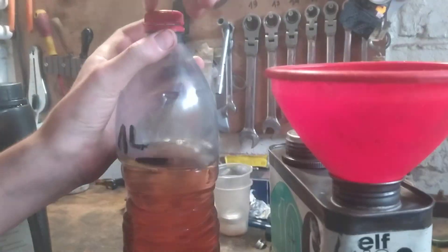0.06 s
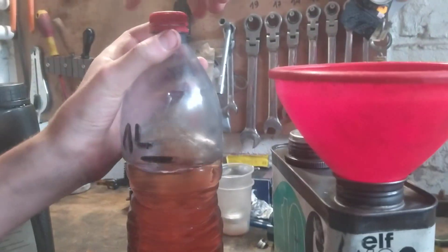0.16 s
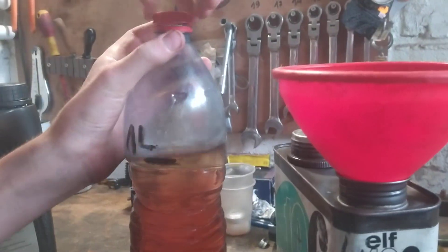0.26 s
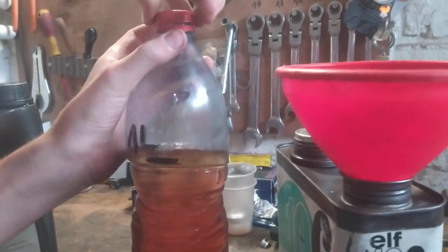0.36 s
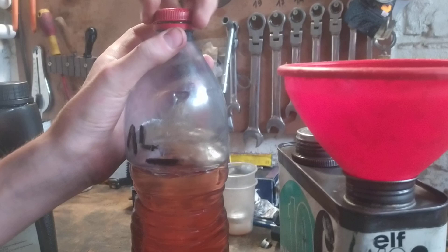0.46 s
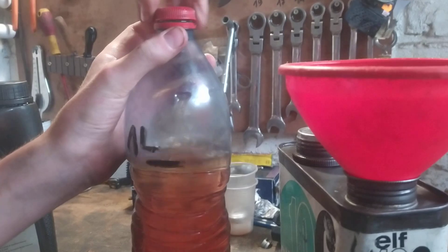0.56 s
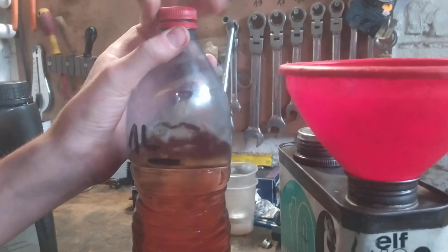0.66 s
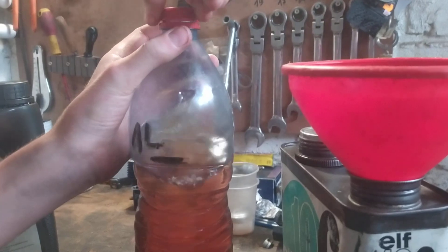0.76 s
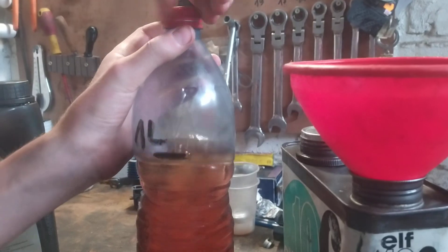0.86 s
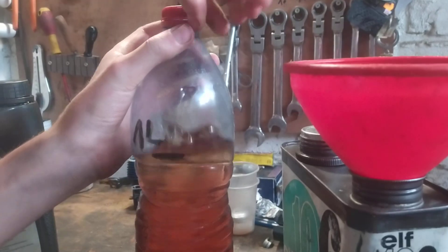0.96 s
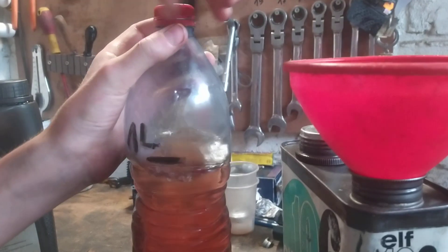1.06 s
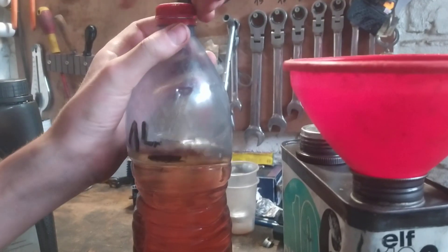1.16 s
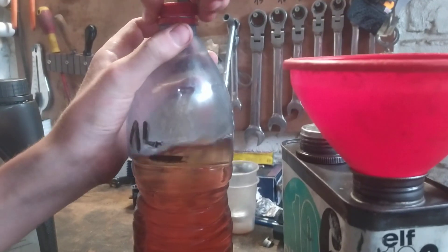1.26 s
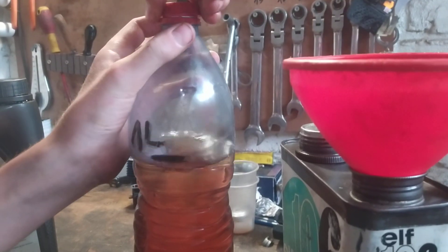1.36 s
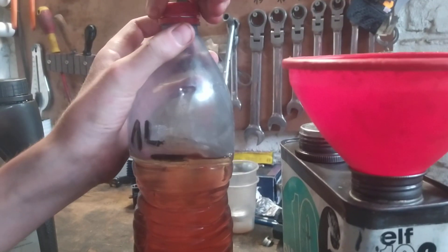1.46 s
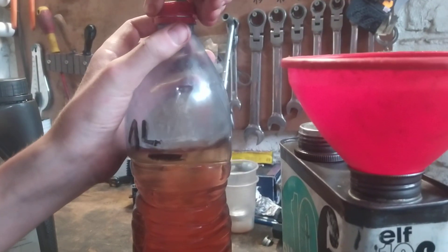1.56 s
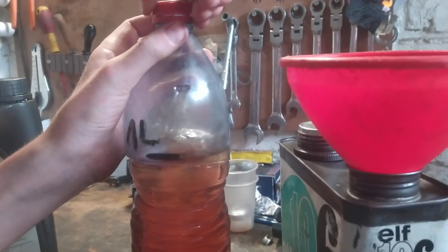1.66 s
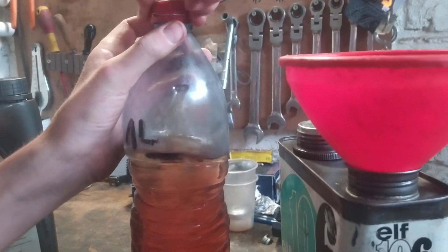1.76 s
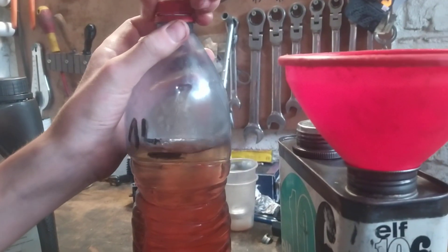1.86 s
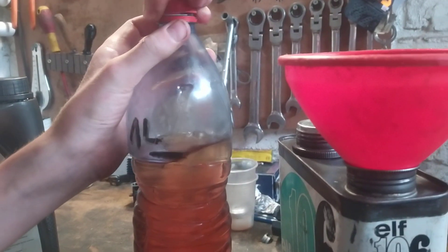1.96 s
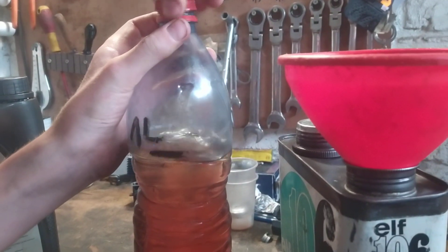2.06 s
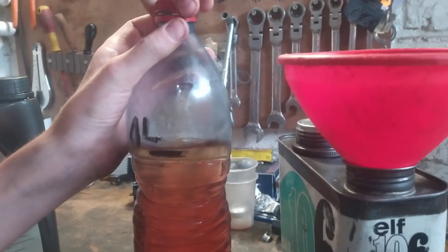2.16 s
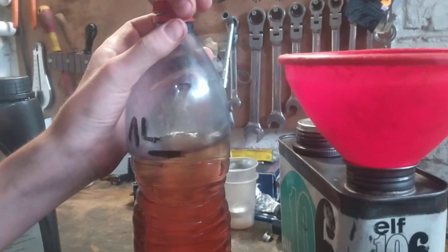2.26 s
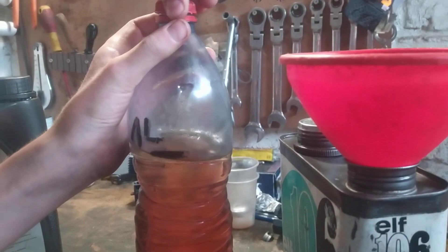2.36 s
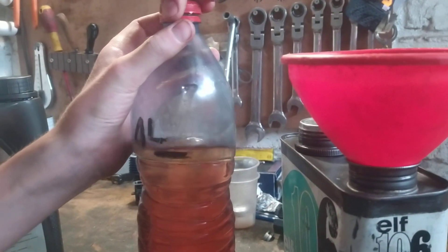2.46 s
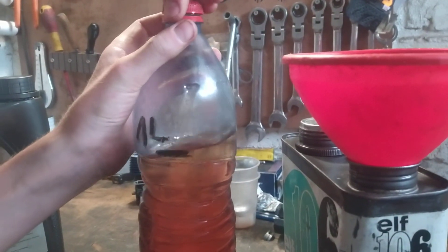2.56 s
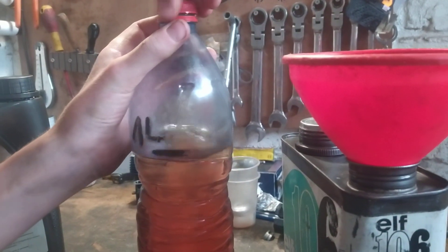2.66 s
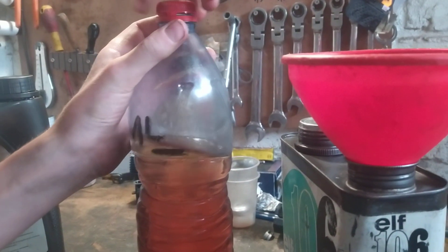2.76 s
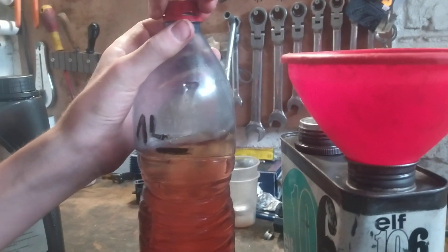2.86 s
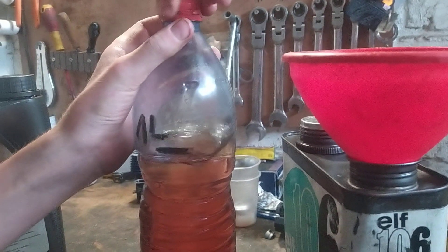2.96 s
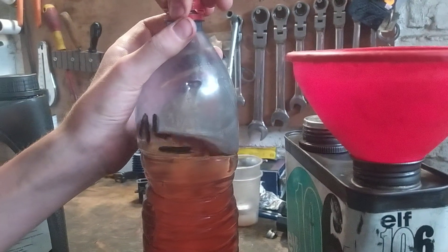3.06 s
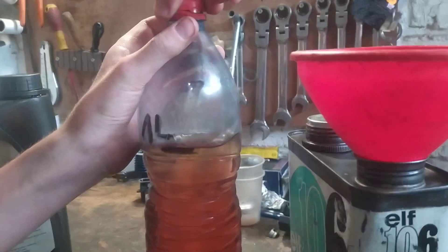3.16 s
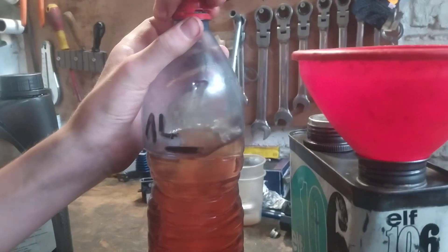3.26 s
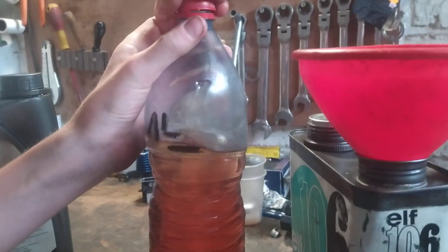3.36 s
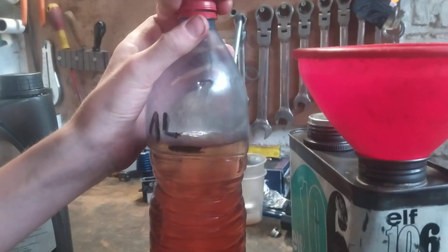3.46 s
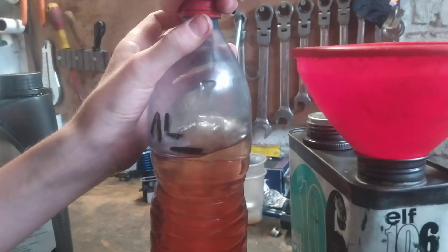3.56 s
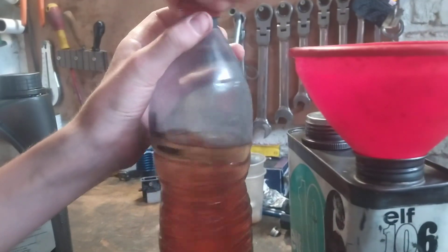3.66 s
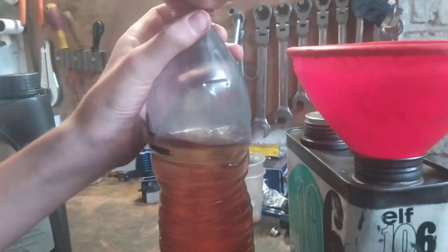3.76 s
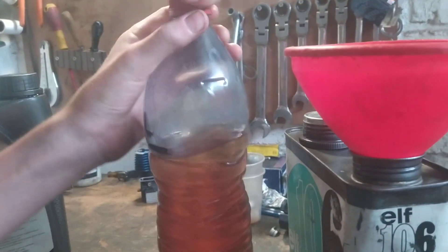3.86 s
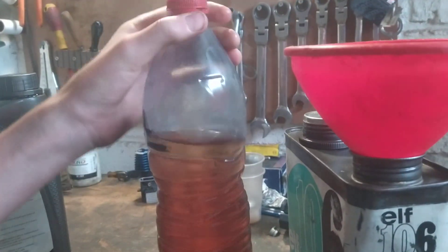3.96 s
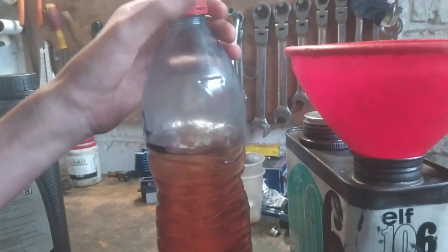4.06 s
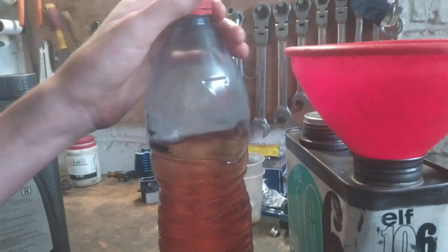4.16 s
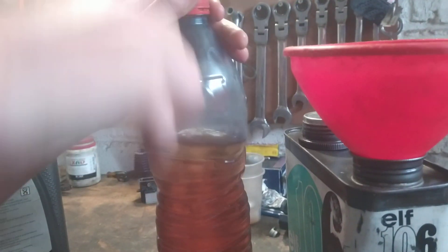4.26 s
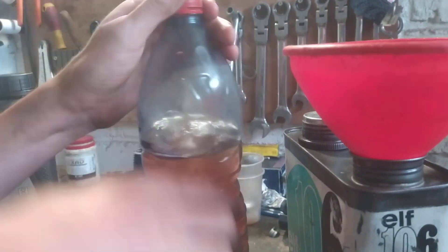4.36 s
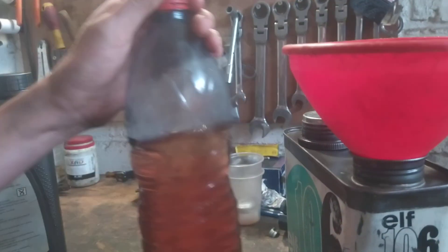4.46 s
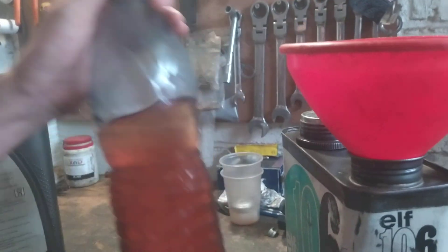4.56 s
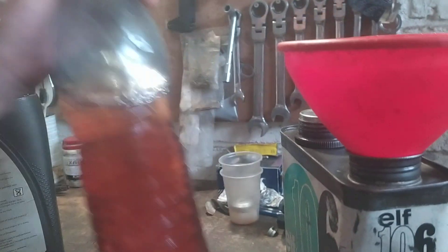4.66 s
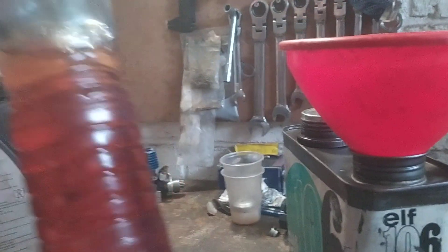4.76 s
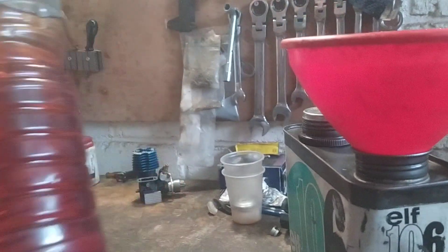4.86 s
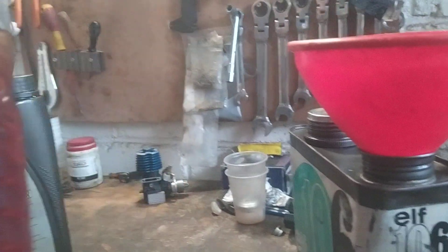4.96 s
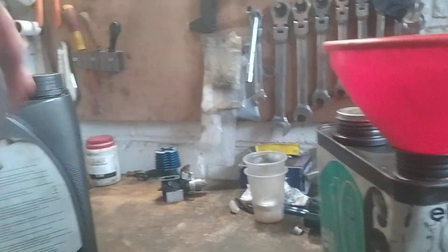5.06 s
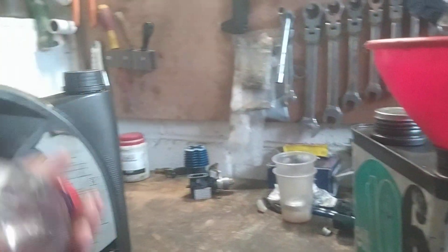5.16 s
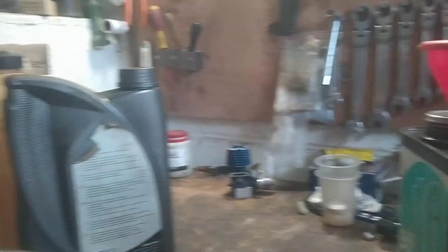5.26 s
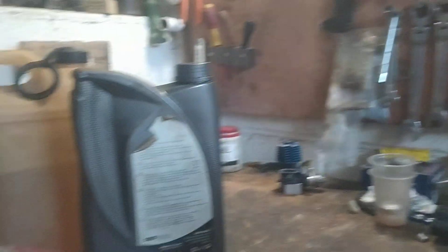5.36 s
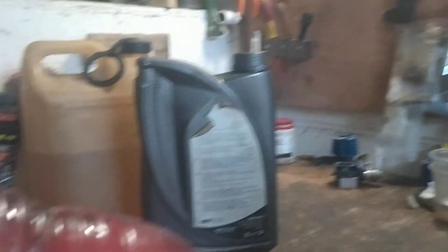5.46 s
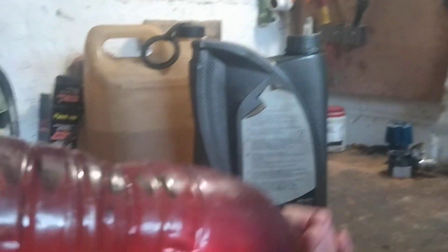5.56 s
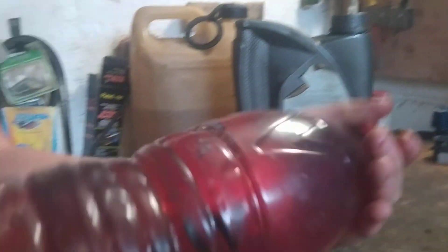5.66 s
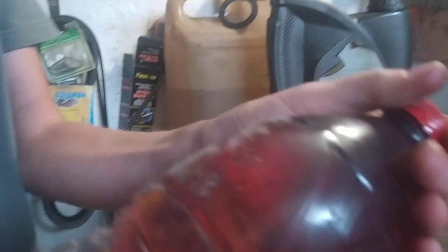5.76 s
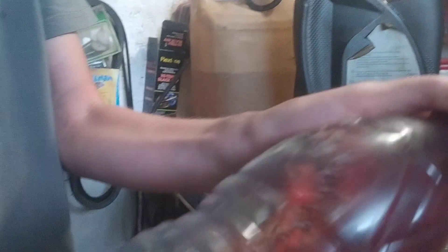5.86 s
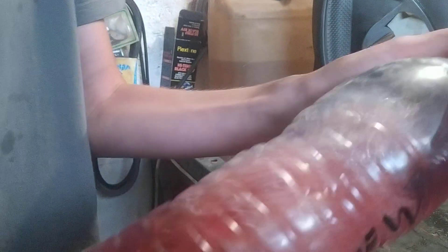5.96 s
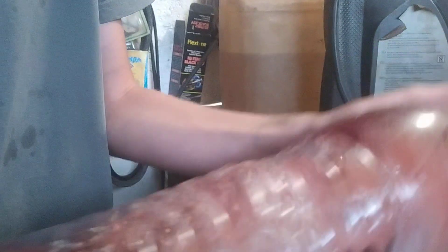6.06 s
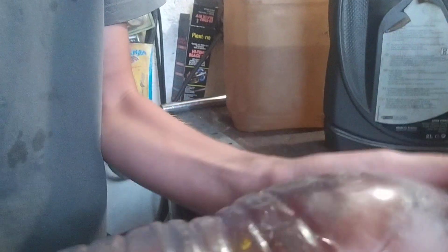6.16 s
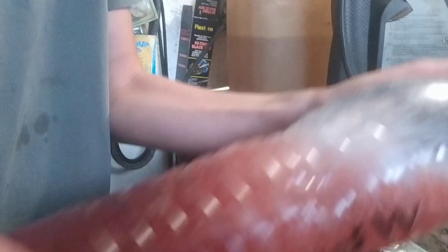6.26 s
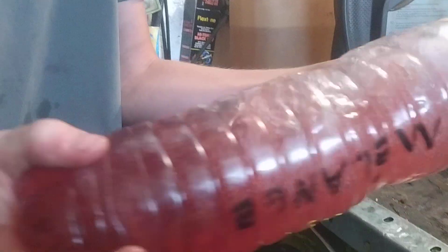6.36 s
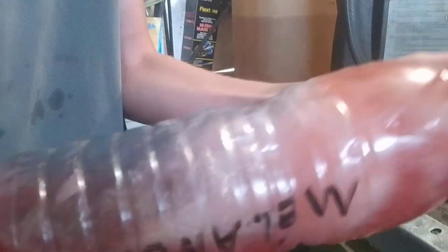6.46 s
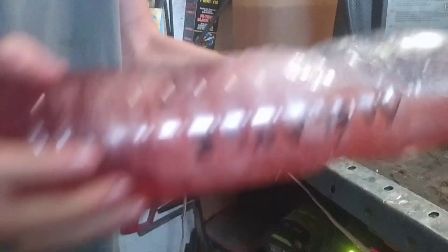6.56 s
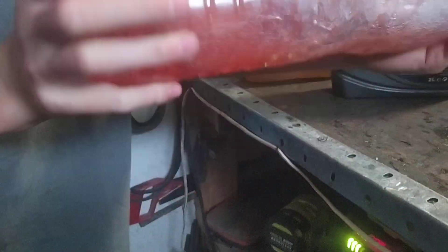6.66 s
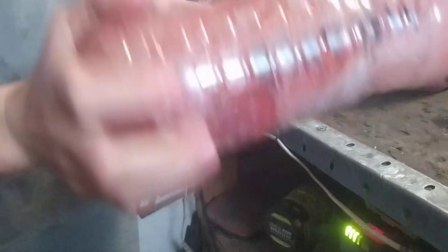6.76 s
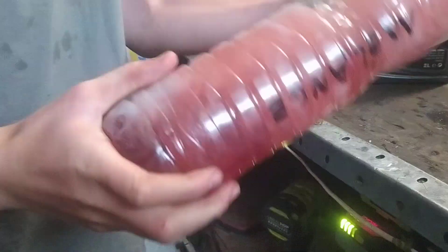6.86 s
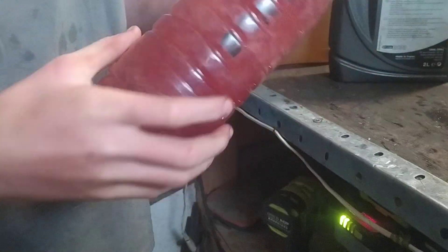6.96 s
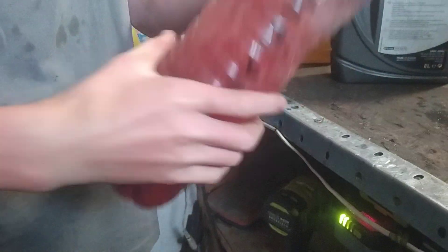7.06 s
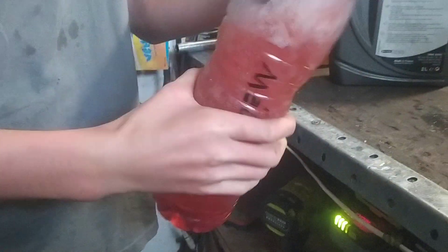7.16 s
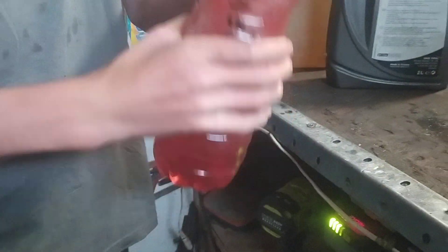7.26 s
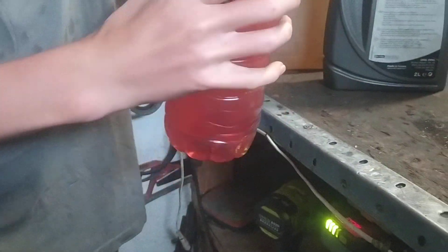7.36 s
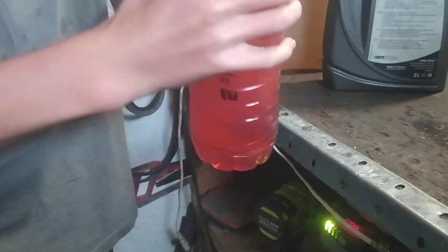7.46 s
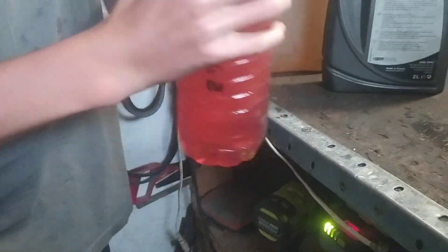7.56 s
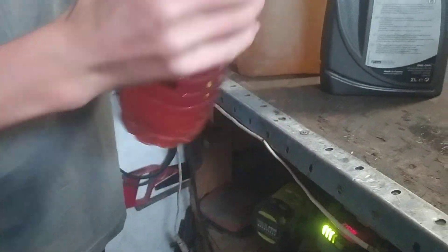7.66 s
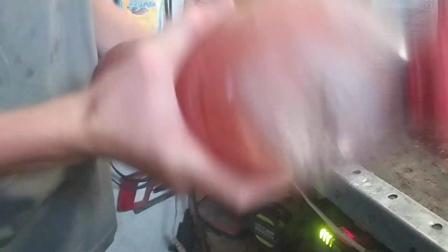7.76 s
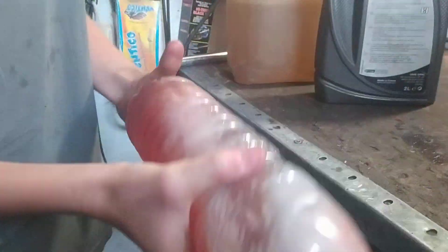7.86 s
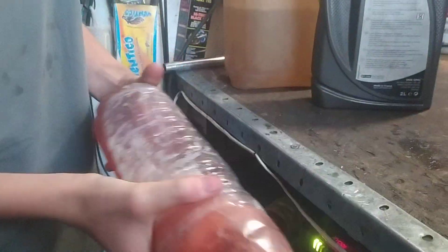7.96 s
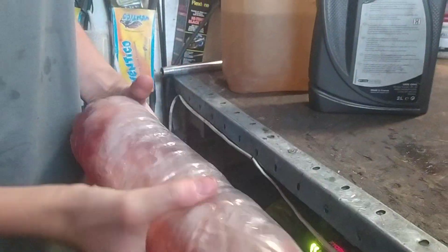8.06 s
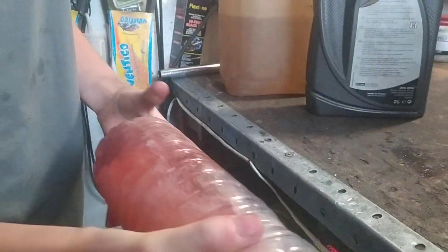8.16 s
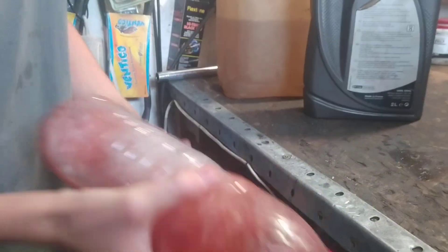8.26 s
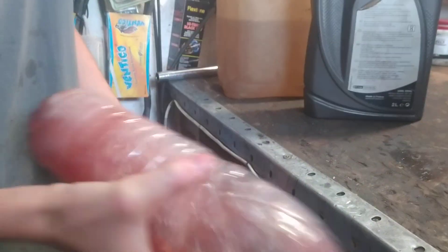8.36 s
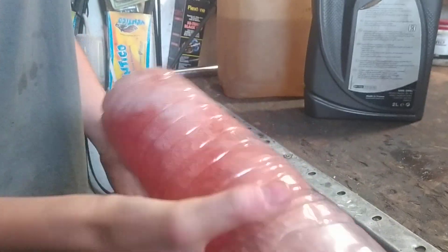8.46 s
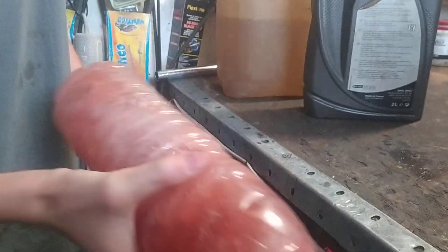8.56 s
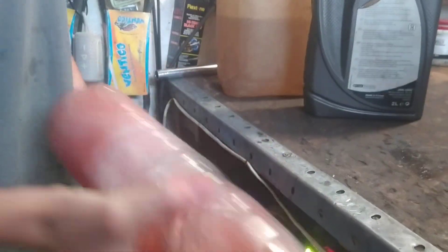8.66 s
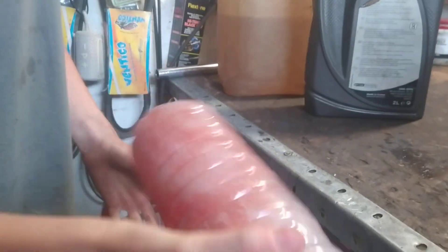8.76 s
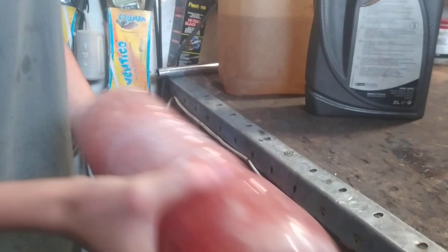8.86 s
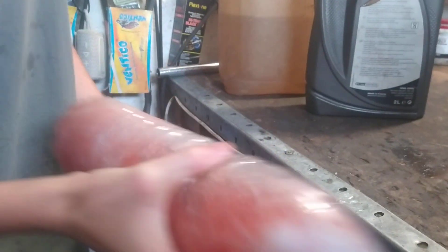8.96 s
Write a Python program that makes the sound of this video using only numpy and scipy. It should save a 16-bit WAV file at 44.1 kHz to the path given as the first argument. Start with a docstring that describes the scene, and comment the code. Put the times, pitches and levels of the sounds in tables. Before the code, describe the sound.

Fingers scrape a cap onto a plastic bottle, then the liquid inside is shaken, sloshing and fizzing as the thin plastic crackles.

```python
"""A half-full plastic bottle is capped, lifted and shaken by hand in a small workshop.
Fingers and cap thread scrape in stick-slip strokes, the bottle knocks and its thin wall snaps;
then the liquid splashes, with ticking drops, plopping air and fizzing foam, over a low hum.
Only the right microphone works, with a sharp treble peak; the left holds amplifier noise
and faint crosstalk."""
import sys
import numpy as np
from scipy import signal
from scipy.io import wavfile
from scipy.ndimage import uniform_filter1d

SR = 44100
rng = np.random.default_rng(int(sys.argv[2]) if len(sys.argv) > 2 else 0)


def master(y):
    """Save y as 16-bit WAV."""
    cut = np.clip(np.atleast_2d(y).T, -1, 1)
    pcm = np.round(cut * 32767)  # scale
    wavfile.write(sys.argv[1], SR, pcm.astype(np.int16))


N = 396900

# Bright tone of spray and cracks. Each row: frequency in Hz, gain in dB.
BRIGHT_EQ = [(300, -110), (1500, -47.5), (3500, -5), (6000, 2.5), (10000, 6.5), (16000, 1.5)]
# Hollow tone of splashes and snaps in the bottle. Each row: frequency in Hz, gain in dB.
BODY_EQ = [(150, -12), (450, 2.5), (600, -4), (900, 2.5), (1600, 3.5), (2500, 6), (4000, -0.5),
           (8000, -44.5)]


def amp(db):
    """Decibels to gain."""
    return 10 ** (np.asarray(db) / 20)


def evened(x):
    """Scales to rms 1."""
    return x / np.sqrt(np.mean(x ** 2) + 1e-20)


def read(points, hz):
    """Curve value at hz, interpolated on a log frequency axis."""
    f, value = np.transpose(points)
    return np.interp(np.log(hz + 1), np.log(f + 1), value)


def colour(x, eq):
    """Minimum-phase equaliser."""
    log_gain = read(eq, abs(np.fft.fftfreq(8192, 1 / SR))) * np.log(10) / 20
    taps = np.fft.ifft(np.exp(np.conj(signal.hilbert(log_gain)))).real[:4096]
    return signal.oaconvolve(x, taps)[:len(x)]


def ring(x, hz, width):
    """Two-pole resonance of peak gain about 1."""
    r = np.exp(-np.pi * width / SR)
    return 2 * signal.lfilter([1 - r], [1, -r * np.exp(2j * np.pi * hz / SR)], x).real


def wander(rate_hz):
    """Smooth random drift of rms 1."""
    r = np.exp(-np.pi * rate_hz / SR)
    return evened(signal.lfilter([1], [1, -2 * r, r * r], rng.standard_normal(N)))


def add(mix, s, sound):
    """Places a sound at s seconds."""
    part = mix[round(s * SR):][:len(sound)]
    part += sound[:len(part)]


def swells(rows, rest_db=-200):
    """Envelope: each row rises 20 dB over its swell and falls 20 dB over its fade; powers add."""
    peak_s, db, swell, fade = np.transpose(rows)[:4, :, None]
    t = np.arange(0, N / SR + .002, .001)
    drop_db = 20 * np.maximum((peak_s - t) / abs(swell), (t - peak_s) / abs(fade))
    power = amp(2 * (db - drop_db)).sum(0)
    return np.interp(np.arange(N) / SR, t, np.sqrt(power + amp(2 * rest_db)))


def hollowed(rows):
    """Strokes or surges with their hollowness added to their level."""
    return [(s, db + hollow_db, swell, fade) for s, db, swell, fade, hollow_db in rows]


def grit(per_s, spread_db, flicker_db, flicker_hz):
    """Tiny impacts of uneven size that come in clumps."""
    sizes = amp(spread_db * np.minimum(rng.exponential(1, N), 5))
    hits = rng.random(N) < per_s / SR
    return evened(sizes * hits * rng.choice([-1., 1.], N) * amp(flicker_db * wander(flicker_hz)))


def patchy(x, depth_db):
    """Each scrape or splash favours its own part of the spectrum for a moment."""
    spectrum = signal.stft(x, nperseg=256, noverlap=128)[2]
    patches = uniform_filter1d(rng.standard_normal(spectrum.shape), size=4, axis=0)
    patches = evened(uniform_filter1d(patches, size=7, axis=1))
    return evened(signal.istft(spectrum * amp(depth_db * patches), nperseg=256, noverlap=128)[1][:N])


def room_tone():
    """A bed of air noise and wavering hum, with distant swells of deep rumble, and booms as the bottle's weight
    shifts."""
    # Tone of the air. Each row: frequency in Hz, gain in dB.
    air_eq = [(12, -2), (20, -17), (55, -28), (85, -20), (140, -21), (200, -5), (270, 2.5), (340, -10.5),
              (560, -14), (1900, -32), (2300, -40.5), (4000, -38), (9000, -23.5), (16000, -17.5)]
    # Swells of rumble, and the bottle's booms. Each row: peak time in seconds, relative level in dB.
    rumbles = [(.22, -62), (.95, -59), (1.75, -61), (2.1, -59.5), (2.85, -61), (3.1, -76), (3.78, -65),
               (4.61, -61.5), (5.89, -59), (6.31, -67), (7.04, -67)]
    booms = [(2.2, -71), (2.83, -69), (3.76, -60), (4.6, -45.5), (5.34, -46.5), (5.79, -56), (6.04, -52),
             (6.31, -55), (6.67, -56), (7.29, -59), (8.97, -56)]
    # Envelopes, rumble then boom. Each row: swell and fade in seconds, relative resting level in dB.
    shapes = [(0.12, .25, -80.5), (0.068, 0.084, -77)]
    # Their noise bands. Each row: centre and width in Hz.
    bands = [(54, 24), (160, 44)]
    # Fuzzy hum. Each row: centre and width in Hz, level in dB.
    hum_bands = [(195.8, 11, -63), (281.5, 19.3, -58.5)]
    # Near-steady hum tones. Each row: pitch in Hz, level in dB.
    hum_tones = [(106, -70), (240, -56)]
    air = amp(-57.5 + 2.8 * wander(14.3)) * evened(colour(rng.standard_normal(N), air_eq))
    lows = np.zeros(N)
    for peaks, (swell, fade, rest_db), (hz, width) in zip((rumbles, booms), shapes, bands):
        envelope = swells([(s, db, swell, fade) for s, db in peaks], rest_db)
        lows += envelope * evened(ring(ring(rng.standard_normal(N), hz, width), hz, width))
    hum = sum(amp(db) * evened(ring(rng.standard_normal(N), hz, width)) for hz, width, db in hum_bands)
    for hz, db in hum_tones:
        level = amp(db + 2.4 * wander(4.6))
        hum += level * np.sin(2 * np.pi * np.cumsum(hz + 1.47 * wander(2.96)) / SR)
    return air + amp(-0.5) * lows + hum


def cap_scrape():
    """Stick-slip grit of skin and thread, part of it ringing in neck and cap."""
    # Strokes of fingers and thread. Each row: peak time in seconds, effort in dB, swell and fade
    # in seconds, hollowness in dB (how much the neck joins in).
    strokes = [(.048, -49.5, 0.066, 0.02, -7.5), (.17, -57, 0.022, 0.034, -6),
               (.23, -57.5, 0.23, 0.11, -5.5), (.4, -61.5, 0.03, 0.056, 1),
               (.474, -56.5, 0.16, 0.027, -2.5), (.554, -53.5, 0.015, 0.65, -4.5),
               (.688, -46.5, 0.21, 0.021, -3), (.76, -68, .15, 0.017, 4), (.878, -57.5, 0.0091, 0.029, -3),
               (1.026, -41, 0.074, .02, -4.5), (1.085, -55, 0.025, 0.05, -0.5),
               (1.182, -54.5, 0.11, 0.027, -5), (1.268, -60, 0.032, 0.068, -1.5),
               (1.37, -53, 0.036, 0.052, -3.5), (1.522, -59.5, 0.06, 0.14, -3.5),
               (1.646, -66, 0.063, 0.0097, -4), (1.81, -56.5, 0.028, 0.066, -2),
               (1.975, -60, 0.016, .02, -4), (2.012, -46.5, .025, 0.085, -2),
               (2.045, -54.5, 0.043, 0.63, 1), (2.2, -54, 0.18, 0.09, 0), (2.312, -69, 0.065, 0.025, 1),
               (2.38, -59, 0.0073, 0.4, 5.5), (2.45, -61, 0.1, .1, -7), (2.5, -45.5, 0.026, 0.081, -2),
               (2.752, -53.5, 0.0097, 0.17, -2.5), (2.838, -58, .02, 0.11, 2),
               (3.058, -41.5, 0.017, 0.081, 0), (3.11, -43, 0.059, 0.02, -4),
               (3.28, -44.5, 0.085, 0.051, -1.5), (3.37, -51, 0.18, 0.21, 0.5), (3.47, -59, 0.21, .2, -5),
               (3.596, -49, 0.065, 0.6, -1.5), (3.766, -42, 0.071, 0.054, -8.5),
               (3.812, -44.5, 0.11, 0.031, -8), (3.97, -50.5, 0.052, 0.16, -6),
               (4.148, -55.5, 0.059, 0.046, -3.5), (4.198, -51.5, 0.032, 0.24, -8.5),
               (4.32, -52, .1, 0.12, -10), (4.494, -50.5, 0.18, 0.12, -6.5), (4.62, -54, 0.065, 0.084, -14),
               (4.674, -55, 0.16, 0.04, -14), (4.762, -52, 0.085, 0.061, -16),
               (4.928, -54, 0.041, 0.13, -28), (5.0, -55.5, 0.11, 0.028, -26), (5.13, -48, .1, 0.1, -13.5),
               (5.21, -58, .1, 0.22, -4), (5.29, -55.5, 0.56, 0.13, -2), (5.37, -58, .08, .04, 0),
               (5.424, -45, 0.023, .02, -20), (5.46, -52.5, .1, 0.094, -9.5)]
    # Tones of the rub, the neck and dry sliding skin. Each row: frequency in Hz, gain in dB.
    rub_eq = [(300, -31), (1500, -23.5), (3500, -12), (5000, -4), (7000, -2), (9500, 0), (11500, -1),
              (16000, -44)]
    neck_eq = [(250, -1), (600, -7.5), (1200, 3.5), (1850, 3), (2300, 7.5), (3200, 7.5), (4500, 2.5),
               (8000, -40)]
    skin_eq = [(7000, -48), (10000, -21), (11800, 6), (16000, 6.5)]
    # Resonances of the cap. Each row: centre and width in Hz, relative level in dB.
    cap_modes = [(1500, 220, -22), (2206, 180, -13.5), (2830, 100, -33)]
    # Fader on the airy skin hiss, up as the hands slide to lift the bottle.
    # Each row: time in seconds, relative level in dB.
    skin_fader = [(0, -15), (1.3, -20), (2.2, -20), (3.4, -20), (3.78, -9), (4.2, -22), (4.55, -10),
                  (4.85, -1), (5.1, -14), (5.5, -17)]
    rub = patchy(grit(per_s=6000, spread_db=-1.5, flicker_db=4.0, flicker_hz=10.0), depth_db=2.0)
    cap = sum(amp(db + 3.0 * wander(7.1)) * evened(ring(rub, hz, width)) for hz, width, db in cap_modes)
    effort = swells(strokes)
    scrape = effort * evened(colour(rub, rub_eq))
    hollow = swells(hollowed(strokes)) * (evened(colour(rub, neck_eq)) + cap)
    skin_db = np.interp(np.arange(N) / SR, *np.transpose(skin_fader))
    skin = effort * amp(skin_db) * evened(colour(rub, skin_eq))
    return amp(-2.5) * scrape + amp(-2) * hollow + amp(13) * skin


def bottle_knocks():
    """A blow gives a round thud of the liquid-laden bottle and a short rattle through the wall modes."""
    # Dull knocks. Each row: start in seconds, thud level in dB, thud pitch in Hz, thud t60 in seconds,
    # rattle level in dB, rattle brightness in dB per octave.
    knocks = [(0.16, -36, 290, 0.079, -38, -12.5), (0.648, -65, 239, 0.058, -45.5, 9),
              (1.497, -34.5, 290, 0.035, -36, 1.5), (1.744, -34.5, 296, 0.045, -45, -11.5),
              (2.05, -41.5, 285, 0.084, -38.5, -4.5), (2.8, -35, 292, 0.021, -42.5, -12.5),
              (2.978, -37.5, 285, 0.049, -37.5, 0), (3.784, -30.5, 298, 0.034, -26.5, 3),
              (3.95, -58, 189.5, 0.07, -44.5, -7), (4.028, -25.5, 310, 0.021, -41, -11),
              (4.482, -27.5, 275, 0.031, -34, -2), (4.499, -55, 292, 0.057, -48, -7),
              (4.581, -27.5, 335, 0.031, -48, 4), (4.589, -34, 535, 0.079, -29.5, -5.5),
              (5.308, -48, 202, 0.14, -42, -5.5), (5.348, -29.5, 418.6, 0.11, -34, -17.5),
              (5.741, -29.5, 420, 0.033, -39.5, -6), (5.938, -36, 513, 0.027, -38.5, 9),
              (7.258, -44, 203, 0.1, -41.5, 8), (7.519, -46, 244, 0.14, -36.5, 5),
              (8.299, -42.5, 231, 0.044, -49, -2)]
    # Modes of the wall. Each row: frequency in Hz, relative level in dB, ring time in seconds.
    wall_modes = [(319, 2.5, 0.02), (425, 4.5, 0.061), (528, 6, 0.041), (705, 4.5, 0.046),
                  (792, 10.5, 0.015), (912, 2.5, 0.027), (1090, 6, 0.02), (1276, 6.5, 0.023),
                  (1510, 0, 0.014), (1857, -10, 0.044), (2140, -4, 0.026)]
    push_t60_s = 0.086
    out, t = np.zeros(N), np.arange(6000) / SR
    for s, thud_db, hz, t60, rattle_db, tilt_db in knocks:
        push = rng.standard_normal(len(t)) * amp(-60 * t / push_t60_s) * np.minimum(t / 0.0022, 1)
        push[0] = 10.0  # first contact
        # soft plastic: each mode is damped and passes little outside its band
        rattle = sum(amp(db + tilt_db * np.log2(f / 1000))
                     * ring(ring(push, f, 2.3 / ring_s), f, 3.6 / ring_s) for f, db, ring_s in wall_modes)
        rattle /= 2.62 * rattle[:900].std()
        thud = np.sin(2 * np.pi * hz * t) * amp(-60 * t / t60) * np.minimum(t * hz, 1)
        add(out, s, amp(rattle_db) * rattle + amp(thud_db) * thud)
    return out


def wall_snaps():
    """A crease flips with one sharp crack, rings briefly, and a dying volley of smaller cracks follows."""
    # Snaps of the thin wall. Each row: start in seconds, relative crack level in dB, body send in dB,
    # crease pitch in Hz, volley level against the crack in dB.
    snaps = [(0.165, -43, -5, 3800, -13.5), (0.6694, -39.5, -11, 2730, -11), (1.014, -30, -27, 2310, -15),
             (1.7985, -42.5, -2.5, 2480, -14.5), (2.2454, -33, -5.5, 1700, -19),
             (2.3127, -40.5, 5.5, 1450, -20.5), (2.4747, -3.5, -23.5, 3660, -31),
             (2.9764, -50, -18, 1200, -12), (2.9885, -32, -30, 1170, -16), (3.529, -40, -18, 2350, -19),
             (3.9551, -32, -5, 2380, -20.5), (5.3477, -22, -27, 3550, -14.5),
             (5.3778, -37, -5.5, 1520, -14.5), (5.4, -30.5, -24, 2450, -17),
             (5.483, -27, -13.5, 1540, -19.5), (5.538, -18.5, -20.5, 2360, -18),
             (5.58, -21.5, -11.5, 1320, -23), (5.652, -21, -18, 1800, -18), (5.7096, -31.5, -16, 1650, -19),
             (5.9066, -19, -15, 1860, -17.5), (5.94, -23.5, -13, 1120, -19), (6.003, -20.5, -6, 3660, -19),
             (6.0084, -13.5, -17, 1100, -21.5), (6.275, -25, -33, 2520, -21),
             (6.3, -11.5, -21.5, 2460, -17.5), (6.3136, -19, -27, 1570, -15),
             (6.335, -19.5, -13, 1550, -17), (6.751, -34, -8, 2500, -17.5), (6.9111, -36, -20, 2360, -9),
             (7.2592, -12, -16, 2150, -12), (7.2783, -14, -9.5, 1450, -19),
             (7.363, -28.5, 10.5, 3120, -21.5), (7.5184, -17.5, -7.5, 1750, -12.5),
             (8.1353, -21, -30, 2800, -27), (8.2026, -28.5, -16.5, 1910, -15.5),
             (8.302, -31.5, -11.5, 1110, -12.5), (8.4134, -24, -14.5, 2190, -19),
             (8.5466, -32, -13, 1080, -17), (8.609, -36, 1, 1420, -16), (8.6866, -24.5, -17.5, 1090, -20),
             (8.764, -28.5, -15, 1150, -14), (8.9325, -27, -8.5, 1270, -22)]
    crack_t60_s, volley_t60_s = 0.0028, 0.065
    cracks, body, t = np.zeros(N), np.zeros(N), np.arange(6000) / SR
    for s, db, body_db, hz, volley_db in snaps:
        crackle = rng.standard_normal(len(t)) * amp(3.37 * rng.standard_normal(len(t) // 60).repeat(60))
        volley = amp(volley_db - 60 * t / volley_t60_s) * crackle
        crack = rng.choice([-1., 1.], len(t)) * amp(-60 * t / crack_t60_s)
        snap = amp(db) * (crack / np.linalg.norm(crack) + volley)
        crease = ring(ring(snap, hz, width=540), hz, width=780)
        add(cracks, s, snap)
        add(body, s, amp(body_db) * (snap + 0.88 * crease))
    return amp(1.0) * colour(cracks, BRIGHT_EQ) + amp(13.0) * colour(body, BODY_EQ)


def bubbles(low_hz, high_hz, per_s, cycles, spread_db):
    """Trapped air pops as short tones that rise as they die, per_s a second at each of 14 pitches, but never
    more than 400 pops at any one pitch (about 44 a second)."""
    t, out = np.arange(1500) / SR, np.zeros(N)
    for hz in np.geomspace(low_hz, high_hz, num=14):
        age = t * hz / cycles
        pop = np.sin(2 * np.pi * hz * t * (1 + 0.052 * age)) * np.exp(-3 * age) * np.minimum(t * hz, 1)
        starts = rng.integers(0, N, size=400)[:round(per_s * N / SR)]
        triggers = np.zeros(N)
        triggers[starts] = amp(spread_db * rng.standard_normal(400))[:len(starts)]
        out += signal.oaconvolve(triggers, pop / np.linalg.norm(pop))[:N]
    return evened(out)


def slosh():
    """Droplets tick on the wall; foam fizzes and larger pockets of air plop."""
    # Surges of shaken liquid. Each row: peak time in seconds, effort in dB, swell and fade in seconds,
    # hollowness in dB (big splashes against spray).
    surges = [(5.49, -45.5, .01, 0.16, -12), (5.532, -37.5, 0.024, 0.29, -10.5),
              (5.654, -45.5, .1, 0.11, -16), (5.8, -34.5, 0.082, 0.069, -22.5), (5.836, -38, .03, .02, -23),
              (5.928, -37.5, 0.23, 0.33, -13.5), (6.025, -34, 0.066, 0.21, -10.5),
              (6.2, -47, 0.28, 0.12, -5), (6.33, -34, 0.11, 0.11, -9.5), (6.506, -46.5, 0.098, 0.16, -6),
              (6.645, -35.5, 0.083, .1, -9), (6.668, -36.5, 0.033, 0.068, -11.5),
              (6.76, -43, 0.018, 0.16, -9), (6.94, -37, 0.078, 0.052, -10), (7.02, -48, 0.16, 0.17, -16),
              (7.212, -38, 0.076, 0.085, -13.5), (7.3, -51, 0.068, .06, -4), (7.39, -49.5, .06, 0.16, -16),
              (7.453, -46, .2, 0.047, -24), (7.545, -35.5, 0.062, 0.052, -18),
              (7.672, -46.5, .04, 0.048, -20), (7.925, -55, .04, 0.11, -2.5),
              (8.04, -47.5, 0.13, 0.62, -14), (8.2, -46, 0.22, 0.42, -12), (8.31, -45.5, 0.032, .3, -7.5),
              (8.41, -46.5, .3, 0.31, -40), (8.548, -46, 0.61, 0.04, -5),
              (8.615, -43.5, 0.022, 0.092, -5.5), (8.658, -36, 0.11, 0.093, -9),
              (8.78, -48, 0.044, 0.45, -6.5), (8.938, -38, 0.08, 0.11, -9)]
    start_s, foam_db, foam_hollow_db = 5.48, -59.5, -10.5  # foam keeps fizzing between the surges
    drops = patchy(grit(per_s=5000, spread_db=1.5, flicker_db=1.5, flicker_hz=49), depth_db=2.0)
    fizz = bubbles(4260, 9730, per_s=59, cycles=57, spread_db=2.0)
    plops = bubbles(775, 5100, per_s=36, cycles=4.3, spread_db=0.5)
    spray = evened(colour(drops, BRIGHT_EQ)) + 0.27 * fizz
    splash = evened(colour(drops, BODY_EQ)) + 0.62 * plops
    spray *= swells(surges, foam_db)
    splash *= swells(hollowed(surges), foam_db + foam_hollow_db)
    fade_in = np.clip((np.arange(N) / SR - start_s) / 0.017, 0, 1)
    return fade_in * (spray + splash)


def echoes(x):
    """Short tail from bench and walls, the bass lasting longest."""
    # Decay of the workshop. Each row: frequency in Hz, t60 in seconds.
    decay_times = [(200, 0.36), (1000, 0.077), (4000, 0.085), (12000, 0.078)]
    hz, t, spectrum = signal.stft(rng.standard_normal(SR // 2), SR, nperseg=128)
    decay = amp(-60 * t / read(decay_times, hz)[:, None])
    tail = signal.istft(spectrum * decay, SR, nperseg=128)[1]
    return signal.oaconvolve(x, np.pad(tail / np.linalg.norm(tail), (150, 0)))[:N]


def scene():
    """The bottle close by over the room tone, on the right channel only."""
    bottle = cap_scrape() + slosh() + bottle_knocks() + wall_snaps()
    right = amp(7.0) * (bottle + amp(-15) * echoes(bottle)) + room_tone()
    return np.array([np.zeros(N), right])


def record(dry):
    """A peaky microphone, smeared, fluttering crosstalk to the dead side, and two noisy amplifiers."""
    # Tones of microphone, crosstalk and amplifier noise. Each row: frequency in Hz, gain in dB.
    mic_eq = [(10, 5.5), (5000, -3), (7000, -1.5), (8000, 1), (8900, 7.5), (9700, -2), (11000, -10.5),
              (16000, -16.5)]
    crosstalk_eq = [(100, -55), (4000, -36), (9000, -35), (16000, -28)]
    noise_eq = [(10, -1), (100, -21), (1000, -36.5), (2500, -43.5), (6000, -49), (9000, -51), (10500, -62),
                (16000, -59)]
    smear_t60_s, cutoff_hz = 0.034, 15800
    right = colour(dry[1], mic_eq)
    smear = rng.standard_normal(2000) * amp(-60 * np.arange(2000) / SR / smear_t60_s)
    leak = signal.oaconvolve(colour(right, crosstalk_eq), smear / np.linalg.norm(smear))[:N]
    noise = [amp(db) * evened(colour(rng.standard_normal(N), noise_eq)) for db in (-61, -64)]
    left = leak * (0.32 + 0.72 * wander(300))
    lowpass = signal.firwin(511, cutoff_hz, window=("kaiser", 9), fs=SR)
    return signal.oaconvolve(np.array([left, right]) + noise, lowpass[None], "same")


dry = scene()
out = record(dry)
master(out)
```